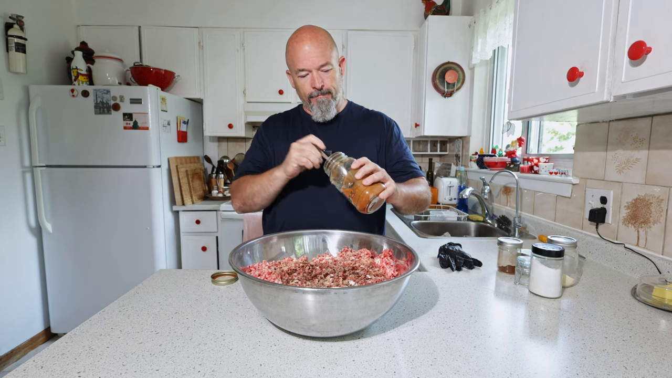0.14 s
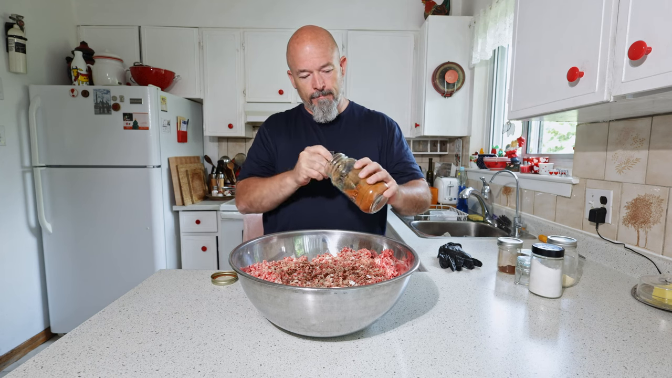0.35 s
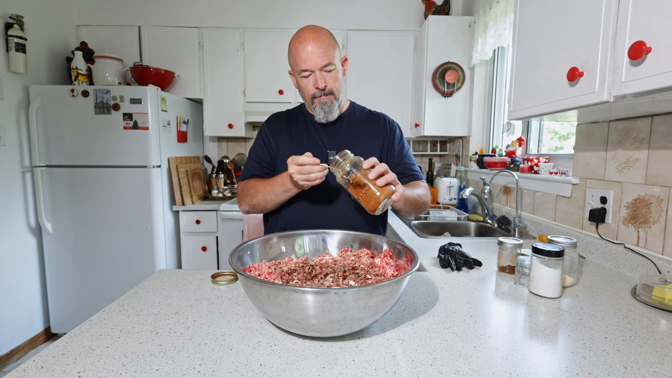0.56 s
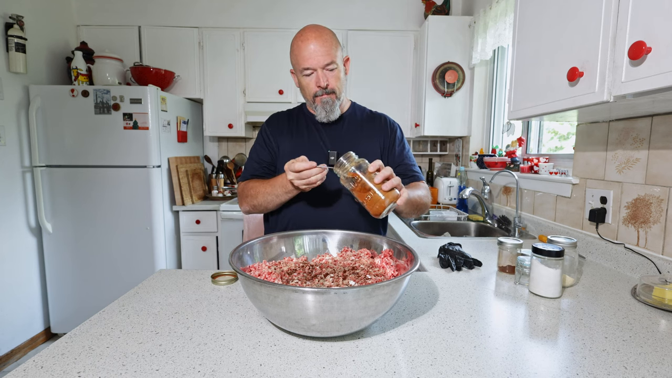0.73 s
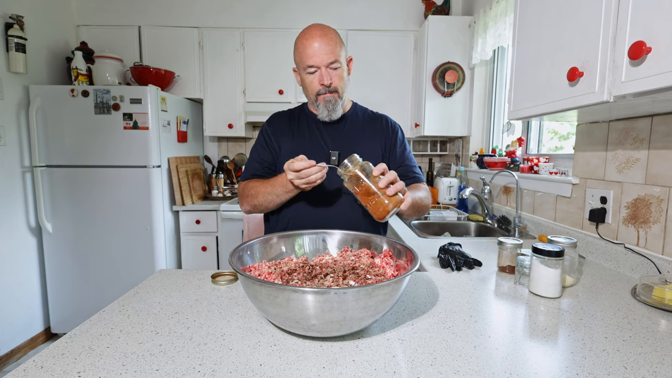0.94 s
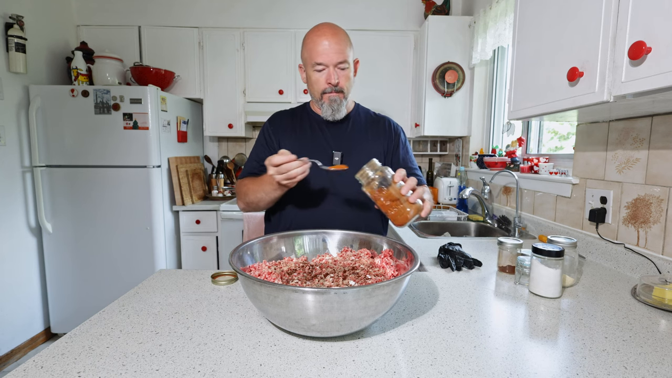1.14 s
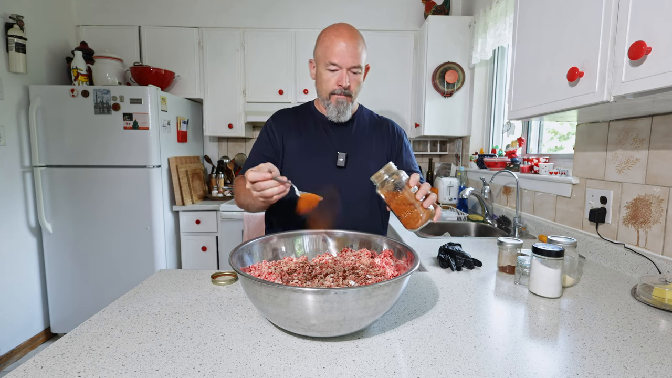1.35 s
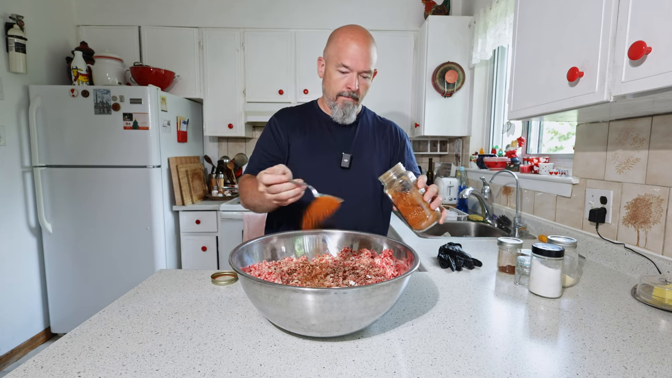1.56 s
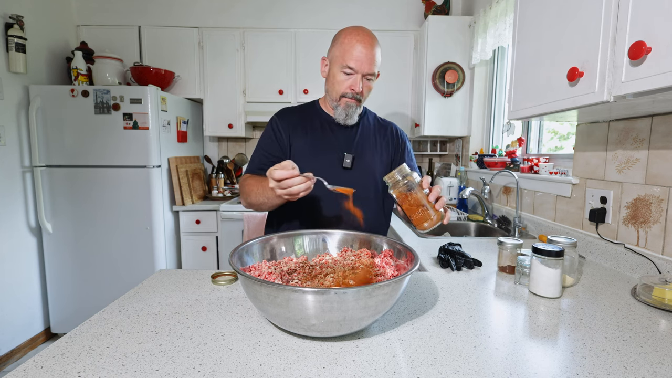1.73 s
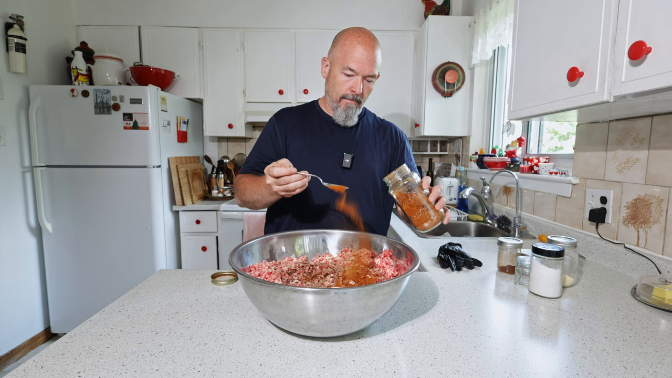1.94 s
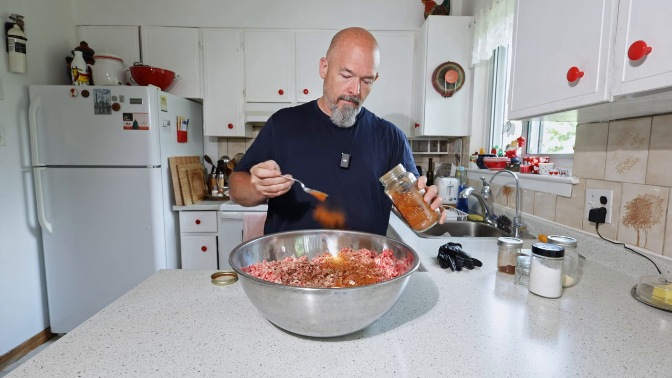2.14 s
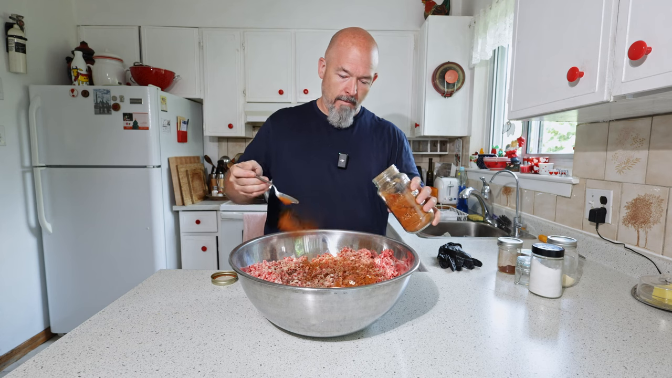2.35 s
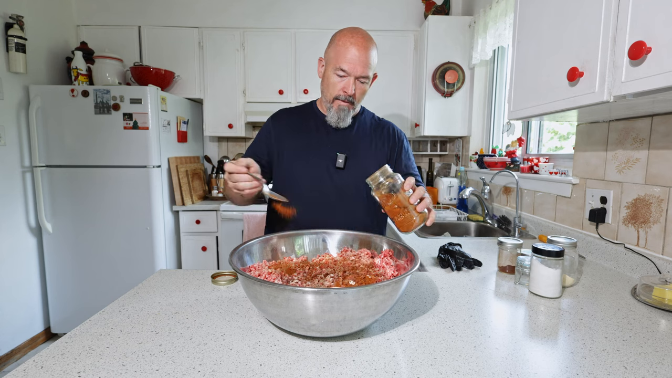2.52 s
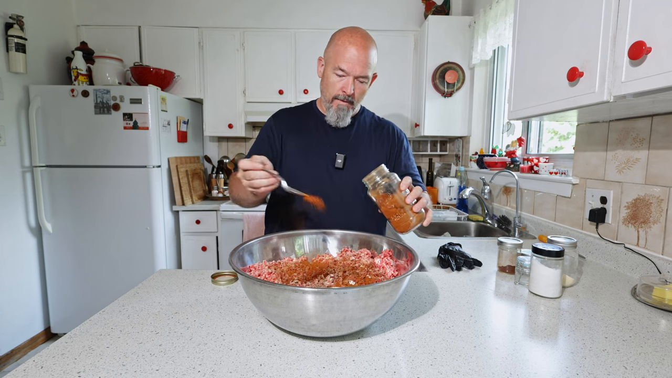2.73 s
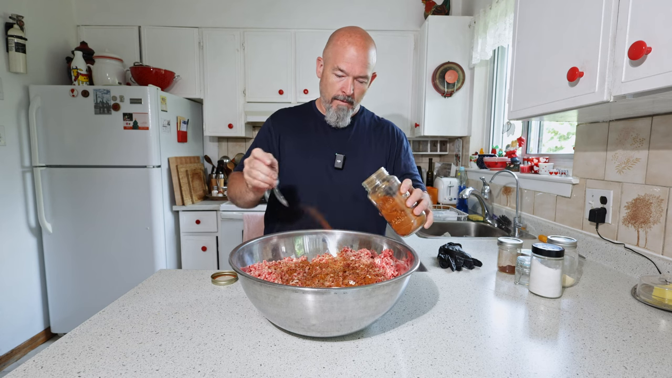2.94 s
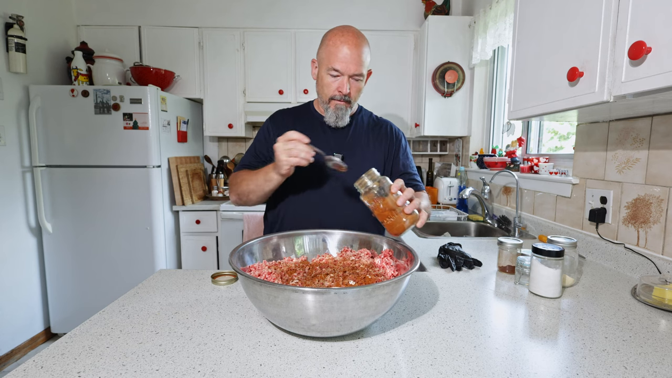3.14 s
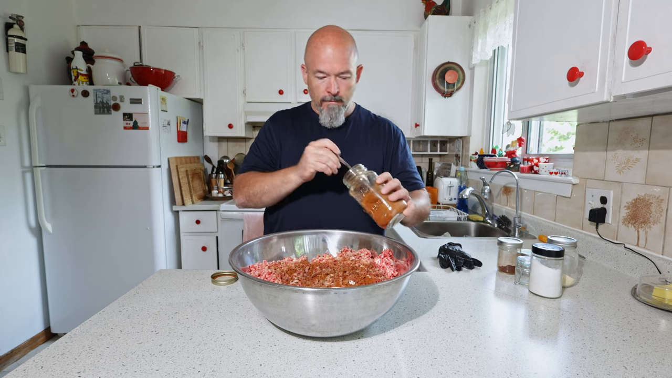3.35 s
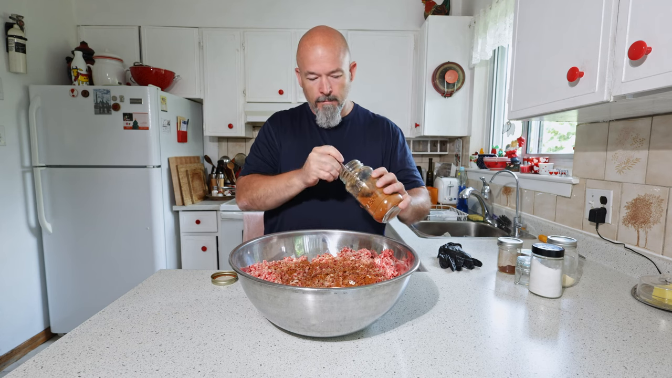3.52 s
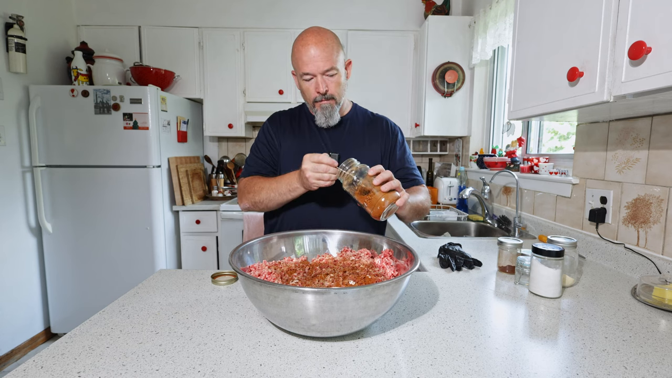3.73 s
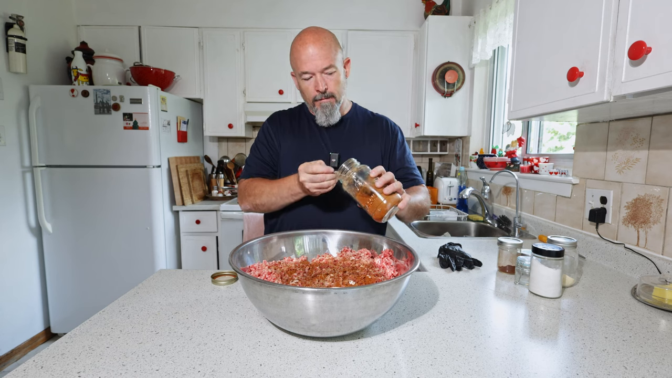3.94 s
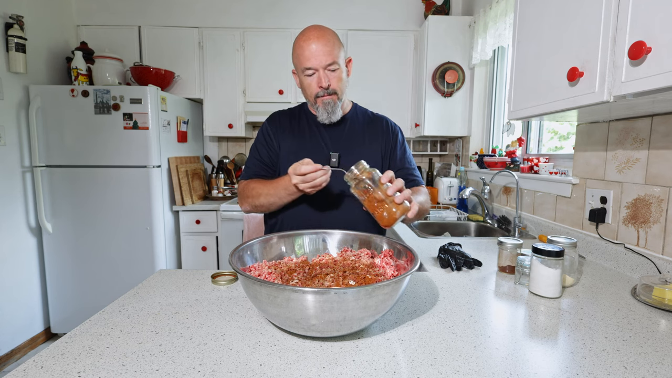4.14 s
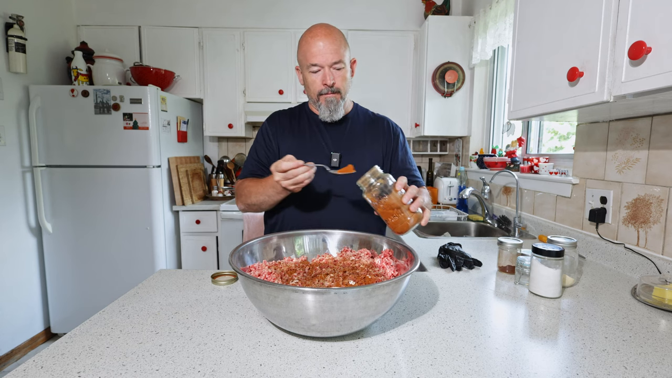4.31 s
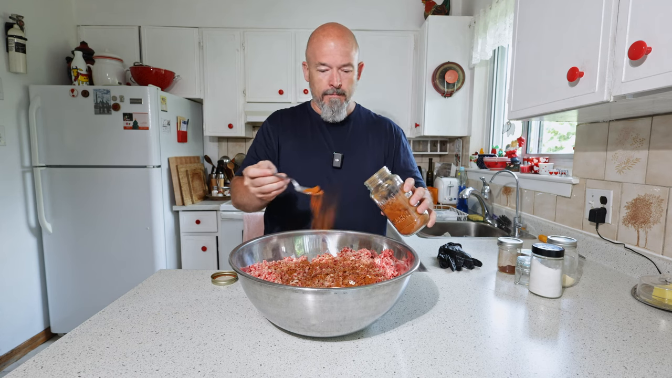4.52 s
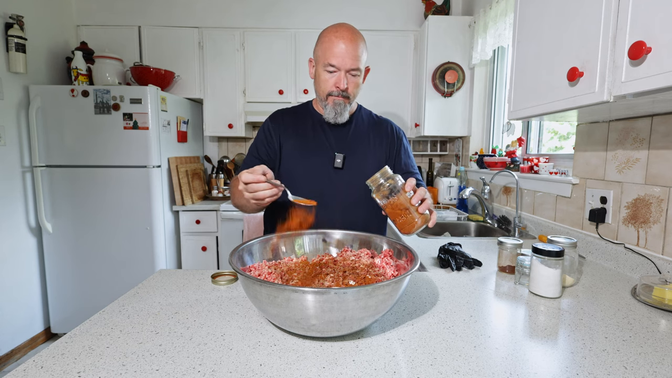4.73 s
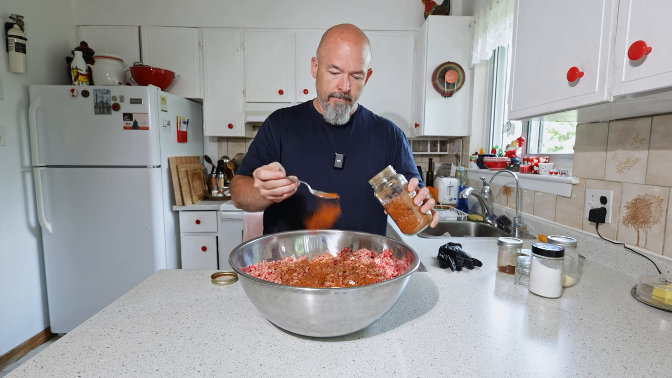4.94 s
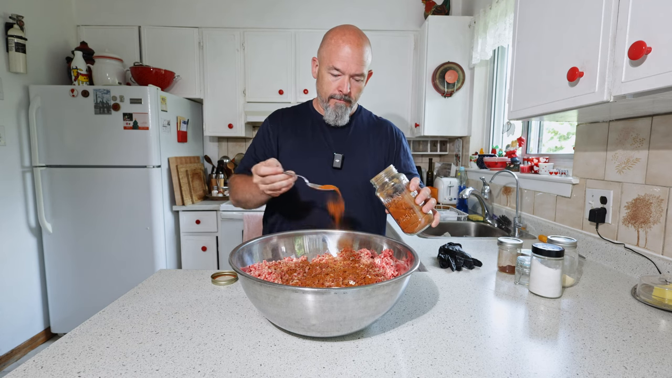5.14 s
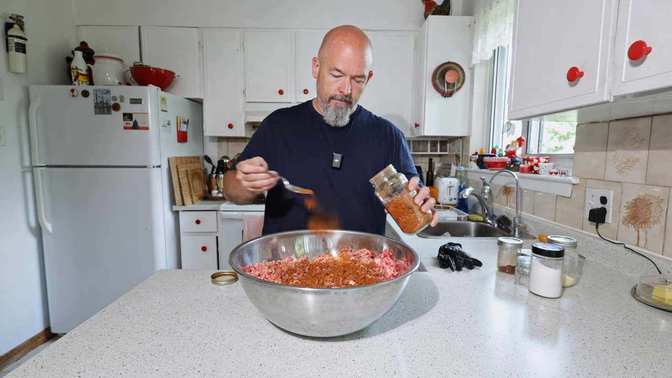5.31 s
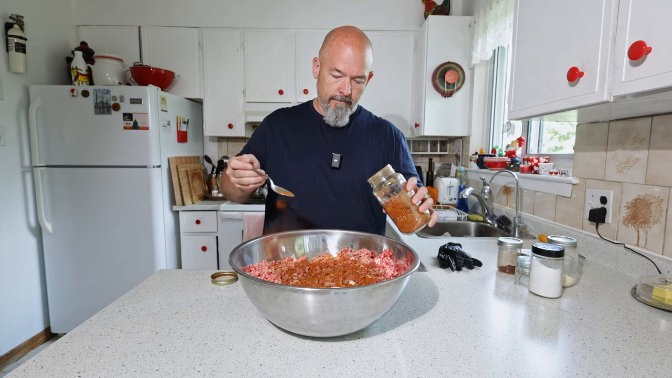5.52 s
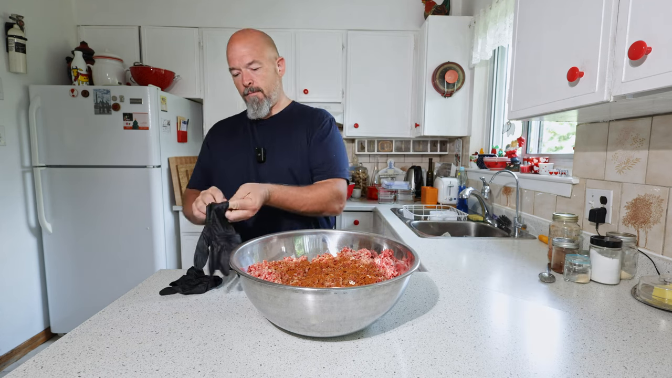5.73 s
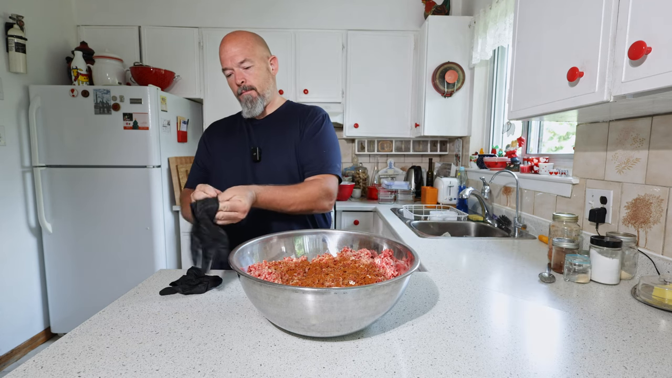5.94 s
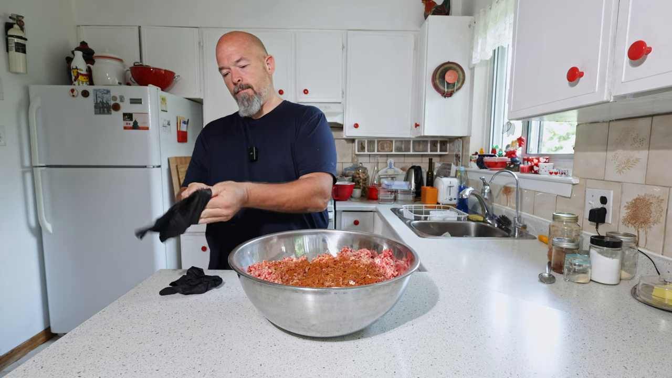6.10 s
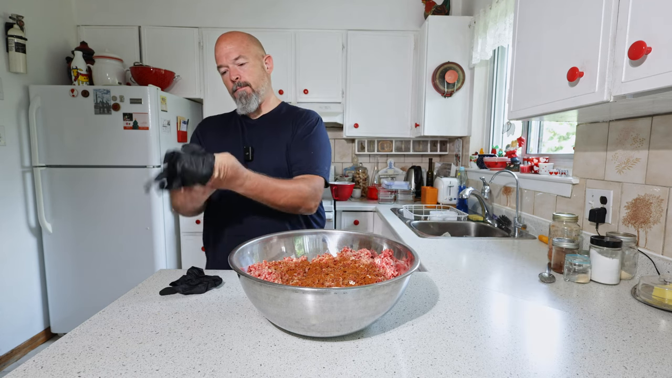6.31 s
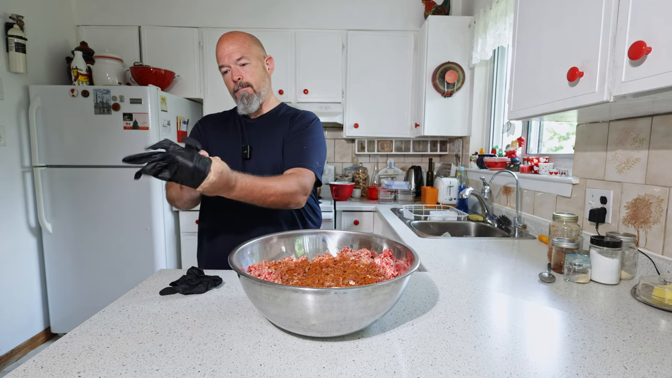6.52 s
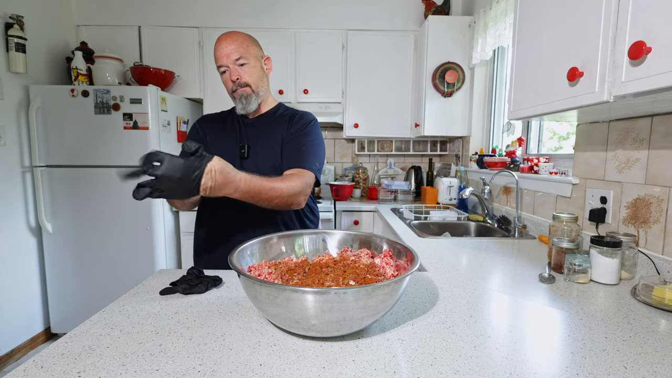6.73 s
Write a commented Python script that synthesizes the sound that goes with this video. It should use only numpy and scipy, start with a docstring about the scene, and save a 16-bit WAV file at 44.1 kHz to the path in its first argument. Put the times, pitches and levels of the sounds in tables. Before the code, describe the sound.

In a kitchen with a steadily humming fridge, a metal spoon knocks against a glass jar in two brief flurries, each with short, damped rings and a faint gritty scrape of powder. After another lull, thin rubber gloves slide over skin with crinkling, sharp snaps and little pops of air. A small body-worn mono microphone hears it all up close, with a slight room echo.

```python
"""A steel spoon knocks and drags on a hand-held glass jar, ringing its modes, and digs in spice powder.
Later thin rubber gloves rustle and slide onto a hand, snapping with a pop of air and a crack of the sheet.
A fridge motor rings its case throughout, over broad kitchen noise. Hard walls give a short echo.
Heard by a small mono microphone on the cook's chest."""
import sys
import numpy as np
from scipy import signal
from scipy.fft import rfft, irfft
from scipy.io import wavfile
from scipy.ndimage import uniform_filter1d

SR = 44100
rng = np.random.default_rng(int(sys.argv[2]) if len(sys.argv) > 2 else 0)


def log_audio(samples):
    """Write samples as a 16-bit WAV file to the path given in sys.argv[1]."""
    # one column per channel
    frames = np.atleast_2d(samples).T
    # limit to full scale, then quantise
    limited = np.clip(frames, -1, 1)
    pcm = np.round(limited * 32767).astype(np.int16)
    wavfile.write(sys.argv[1], SR, pcm)


N = 298326
TIME_S = np.arange(N) / SR


def undb(db):
    """dB to gain."""
    return 10 ** (np.asarray(db) / 20)


def unit(x):
    """Scale to rms 1."""
    return x / np.sqrt(np.mean(x ** 2))


def band(x, hz, width_hz):
    """Resonant band-pass, gain 1 at the centre."""
    return signal.lfilter(*signal.iirpeak(hz, hz / width_hz, SR), x)


def steep_band(x, hz, width_hz):
    """Two band-passes in series, the second twice as wide."""
    return band(band(x, hz, width_hz), hz, 2 * width_hz)


def add(out, start_s, x):
    """Mix x in at start_s."""
    i = int(start_s * SR)
    out[i:i + len(x)] += x[:len(out) - i]


def grains(scatter_db):
    """Dense slips of very uneven size."""
    return unit(rng.standard_normal(N) * undb(scatter_db * rng.exponential(size=N)))


def wander(rate_hz):
    """Slow random drift, rms 1."""
    k = int(SR / rate_hz)
    return unit(uniform_filter1d(uniform_filter1d(rng.standard_normal(N + k), k), k)[:N])


# Each row: frequency in Hz, relative spectral density in dB.
AIR_SPECTRUM = [(28, -50), (48, -20), (100, -23.5), (190, -10), (420, -8), (800, -16), (1300, -24),
                (2500, -32.5), (6000, -38), (15500, -39.5), (15900, -44)]


def kitchen_air():
    """Broad room noise, strongest in the low mids."""
    hz, db = np.transpose(AIR_SPECTRUM)
    bin_hz = np.arange(N // 2 + 1) * SR / N
    shape_db = np.interp(np.log(bin_hz + 1), np.log(hz), db, left=-90, right=-90)
    return unit(irfft(rfft(rng.standard_normal(N)) * undb(shape_db), N)) * undb(-47.5)


# Each row: centre in Hz, width in Hz, relative level in dB.
FRIDGE_CASE = [(61, 4.1, -65), (132.6, 15, -53.5), (234.8, 15, -50), (481.8, 38, -52.5), (752.5, 3.2, -61),
               (2690, 270, -68), (4155, 150, -71.5)]
# Each row: frequency in Hz, relative level in dB.
FRIDGE_TONES = [(1421, -74), (2735, -68), (2826, -77), (3187, -85), (3505, -71.5), (3898, -77.5),
                (4091, -78)]


def fridge():
    """The motor rings the case; thin tones waver in level above it."""
    case = sum(undb(db) * unit(band(rng.standard_normal(N), hz, width)) for hz, width, db in FRIDGE_CASE)
    tones = sum(undb(db - 1 + 2 * wander(3.9)) * np.sin(2 * np.pi * hz * TIME_S)
                for hz, db in FRIDGE_TONES)
    return case + tones


# Each row: gain in dB of the ten mode families (inside air, 3 wall, rim, 3 neck, 2 spoon).
# Rows are places: 0 lip, 1 neck, 2 belly, 3 bottom through the powder.
PLACE_GAINS_DB = [(-15.5, -6, -8, -14.5, 0.5, -9.5, -18, -10.5, 6.5, -3.5),
                  (-12, -3, 2, -12, -8.5, -21, -8, -15, -8, -3),
                  (-3, -5, -13, 1, -17.5, -15.5, -30, -32, -17, -14.5),
                  (3.5, 6, -10, -17.5, -16, -22, -35, -33, -35, -22)]


def landing_db(place):
    """Where the spoon lands sets which families ring; interpolated between places."""
    return np.array([np.interp(place, range(len(family)), family)
                     for family in np.transpose(PLACE_GAINS_DB)])


# Hand-damped jar and spoon, one family per row. Each mode: frequency in Hz, relative level in dB, t60 in s.
JAR_MODES = [
    [(218, 0, 0.025), (522, 5, 0.034)],
    [(1024, 8.5, 0.007), (1422, -5, 0.026), (1694, -6, 0.02)],
    [(2105, 2, 0.018), (2270, -5, 0.046), (2373, 6.5, 0.016), (3195, -6, 0.049)],
    [(2560, -12, 0.046), (2862, -3, 0.043), (2877, -13, 0.12)],
    [(4030, -20, 0.011), (3717, 4, 0.038), (3800, -36.5, 0.54), (3940, -5.5, 0.044)],
    [(4680, -3.5, 0.033), (5080, -13, 0.11), (5140, -13, 0.062)],
    [(5556, 3.5, 0.057)],
    [(5836, 14.5, 0.015), (6000, 4.5, 0.033)],
    [(7300, -2.5, 0.014), (8180, -2.5, 0.015), (8500, -23, 0.061)],
    [(10070, -4.5, 0.015), (11060, -3.5, 0.014), (13570, -6, 0.02), (14900, -13.5, 0.024),
     (15300, -25, 0.11)],
]
# Each row: start in seconds, base level in dB, place 0-3, hardness in dB per octave,
# pitch the hand leaves free in Hz, its boost in dB.
SPOON_KNOCKS = [(0.136, -42, 2.9, -2, 1500, 6), (0.1551, -42, 2.7, -1.5, 1500, 6),
                (0.177, -46.5, 0.116, -2, 4800, 22.5), (0.2591, -29, 2.2, 2, 2800, 3),
                (0.2823, -10.5, 0.01, .6, 2200, 2.5), (0.3365, -25, 0.97, -3.5, 2300, 4),
                (0.343, -35.5, 0.64, 5, 2900, 6), (0.432, -48, 0.71, 5, 6000, 3),
                (0.4824, -39.5, 1, 0, 2290, 8), (0.514, -42.5, 0.96, 0, 2300, 5),
                (0.542, -40, .6, 1, 5940, 7.5), (0.6424, -10, 1.98, 0.7, 2900, 0),
                (0.7591, -20, 2.12, 1.8, 3800, 12), (0.8838, -28.5, 2.7, .1, 2900, 1.5),
                (1.018, -26, 2.26, 0.2, 3740, 13), (3.422, -14, 1.06, 1, 3730, 3.5),
                (3.651, -37, 1.1, 5, 5600, 2), (3.677, -33, 1.24, 2, 2310, 4),
                (3.712, -36.5, .6, 4.5, 6100, 5), (3.741, -41.5, 0.98, 1.5, 6200, 12),
                (3.767, -36.5, 0.95, -.6, 6140, 4), (3.7909, -36.5, 1.9, 0, 6100, 15),
                (3.813, -51, 1.8, .6, 6100, 9), (3.954, -17.5, 1.71, -.6, 3770, 14),
                (4.016, -35, 2.95, -3, 1100, 9), (4.0482, -32.5, 2.8, 0, 3780, 18),
                (4.0644, -29.5, 2.22, 0, 3800, 17), (4.129, -41, 3.3, -2.5, 1480, 6)]


def spoon_knocks(crack_db=-6, crack_t60_s=0.0091, rebound_db=-17, free_width_oct=0.11):
    """Each blow starts the jar's modes, with a short crack of contact on top."""
    out, t = np.zeros(N), np.arange(SR // 4) / SR
    hz, mode_db, t60_s = np.vstack(JAR_MODES).T[:, :, None]
    octaves = np.log2([family[0][0] / 3000 for family in JAR_MODES])
    attack = np.minimum(t / 0.00097, 1)
    for start_s, level_db, place, hardness, free_hz, boost_db in SPOON_KNOCKS:
        freedom = np.exp(-((octaves - np.log2(free_hz / 3000)) / free_width_oct) ** 2)
        family_db = level_db + landing_db(place) + hardness * octaves + boost_db * freedom
        struck_db = np.repeat(family_db, [len(family) for family in JAR_MODES])[:, None]
        # A hard blow rebounds; after a light one the spoon rests on the glass and damps it.
        t60_scale = undb(0.19 * min(max(family_db[2:]) - rebound_db, 0))
        detune, phase, scatter = rng.standard_normal((3, len(hz), 1))
        modes = np.sin(2 * np.pi * hz * (1 + 0.0018 * detune) * t + 2 * phase)
        modes *= undb(struck_db + mode_db + 2.4 * scatter - 60 * t / (t60_s * t60_scale))
        crack = np.diff(rng.standard_normal(len(t) + 1))
        crack *= undb(family_db[-1] + crack_db - 60 * t / crack_t60_s)
        add(out, start_s, (modes.sum(axis=0) + crack) * attack)
    return out


# Each row: start in seconds, hold in seconds, glass base level in dB, place 0-3, singing mode in Hz,
# its level in dB, powder level in dB, grit level in dB, fade in dB per second.
SPOON_DRAGS = [(0.287, .005, -33, .5, 2300, -38, -59, -50, 194),
               (.42, 0.111, -60, .6, 2300, -58, -58, -66, 63),
               (0.64, 0.0042, -36, 1.95, 2918, -37, -33, -40, 175),
               (0.763, 0.037, -48, 1.9, 3741, -49, -48, -59, 112),
               (3.435, .09, -56, 0.65, 3741, -49, -48, -60, 250),
               (3.7, .12, -58, 0.91, 6160, -59, -63, -70, 350),
               (3.957, .06, -52, 2.2, 3736, -48, -54, -57, 200),
               (4.04, .04, -48, 1.8, 3736, -47, -48, -68, 270)]


def spoon_drags(rise_s=0.0094):
    """Small slips ring walls, rim and neck, one mode singing; powder crunches and grits on the glass."""
    out, t = np.zeros(N), np.arange(SR // 2) / SR
    slips = grains(scatter_db=3)
    ringing = np.array([unit(sum(undb(db) * unit(band(slips, hz, 4.5 / t60)) for hz, db, t60 in family))
                        for family in JAR_MODES[2:8]])
    crunch = grains(scatter_db=2.46)
    powder = unit(steep_band(crunch, 1500, 2200))
    grit = unit(steep_band(crunch, 5050, 1000))
    for start_s, hold_s, glass_db, place, sing_hz, sing_db, powder_db, grit_db, fade in SPOON_DRAGS:
        span = slice(int(start_s * SR), int(start_s * SR) + len(t))
        envelope = np.minimum(t / rise_s, 1) * undb(-fade * np.maximum(t - hold_s, 0))
        glass = undb(glass_db + landing_db(place)[2:8]) @ ringing[:, span]
        spice = undb(powder_db) * powder[span] + undb(grit_db) * grit[span]
        singing = undb(sing_db) * unit(band(slips[span], sing_hz, width_hz=40))
        add(out, start_s, envelope * (glass + spice + singing))
    return out


# Each row: centre in Hz, width in Hz. Rows: cuff air, finger pockets, loose sheet, taut sheet, crinkle,
# high treble peak near 15 kHz heard in the rustle and snaps.
GLOVE_BANDS = [(470, 283), (1400, 620), (2550, 1900), (5300, 2800), (8600, 5000), (14800, 1800)]
# Sliding colour: relative gain in dB per glove band.
SLIDE_COLOUR_DB = (1.6, -0.4, -1, -2.5, -2.5, -5)
# Each row: time in seconds, base level of cuff and pockets in dB, base level of the sheet in dB.
SLIDE_LEVELS = [(5.725, -37, -50), (5.75, -35, -43.5), (5.8, -43, -51), (5.865, -45, -43.5),
                (5.95, -47, -54.5), (5.995, -48, -34), (6.03, -58.5, -42.5), (6.13, -50, -46),
                (6.175, -29.5, -41), (6.21, -40, -41.5), (6.24, -40, -46), (6.33, -39.5, -42.5),
                (6.39, -33.5, -37.5), (6.46, -40, -42), (6.53, -22, -37.5), (6.575, -24.5, -36.5),
                (6.63, -43, -47.5), (6.7, -38, -50), (6.765, -24, -48)]


def glove_slide():
    """Rubber slips over skin, feeding each band in patches."""
    out, patches = np.zeros(N), wander(44)
    times_s, *levels_db = np.transpose(SLIDE_LEVELS)
    hollow, sheet = undb([np.interp(TIME_S, times_s, db, left=-120, right=-120) for db in levels_db])
    for gain, colour_db, (hz, width_hz) in zip([hollow] * 2 + [sheet] * 4, SLIDE_COLOUR_DB, GLOVE_BANDS):
        flicker_db = 1.56 * patches + 1.3 * wander(66.4)
        rustle = unit(steep_band(grains(scatter_db=2.77), hz, width_hz))
        out += gain * undb(colour_db + flicker_db - 3) * rustle
    return out


# Each row: start in seconds, pop level in dB, pop pitch in Hz, crack level in dB, crack pitch in Hz.
GLOVE_SNAPS = [(5.728, -36, 1400, -31, 6000), (5.79, -25, 900, -28, 8000),
               (5.797, -21.5, 1490, -20.5, 6540), (5.8469, -16.5, 1100, -16.5, 3500),
               (5.8533, -20.5, 600, -18, 13000), (5.9668, -24, 550, -18, 9000),
               (5.9744, -10, 900, -6, 2400), (5.9777, -7, 2500, -3.5, 9600), (5.986, -31, 2400, -20, 13000),
               (6.1556, -13, 1090, -17, 4860), (6.249, -39, 1400, -28, 2600),
               (6.281, -22.5, 1100, -43, 5000), (6.303, -20, 1270, -46, 6000),
               (6.3572, -30, 600, -38, 6000), (6.368, -21, 1450, -25, 7800), (6.378, -15, 1400, -32, 6000),
               (6.3956, -19, 800, -15, 3480), (6.427, -39, 1400, -27, 3400), (6.53, -13, 950, -41, 5000),
               (6.5425, -29.5, 650, -33, 4500), (6.5688, -37, 500, -14, 7800),
               (6.7413, -27, 950, -43, 4500)]


def glove_snaps(pop_db_per_oct2=13, crack_db_per_oct2=12, flap_t60_s=0.38):
    """Trapped air pops and the sheet cracks, then flaps on loosely."""
    out, t = np.zeros(N), np.arange(SR // 5) / SR
    for start_s, pop_db, pop_hz, crack_db, crack_hz in GLOVE_SNAPS:
        for hz, width_hz in GLOVE_BANDS:
            pop = undb(pop_db - pop_db_per_oct2 * np.log2(hz / pop_hz) ** 2)
            crack = undb(crack_db - crack_db_per_oct2 * np.log2(hz / crack_hz) ** 2)
            t60_s = 0.024 * (1400 / hz) ** 0.27  # treble dies first
            burst = steep_band(rng.standard_normal(len(t)) * undb(-60 * t / t60_s), hz, width_hz)
            add(out, start_s, (pop + crack) * burst / np.abs(burst).max())
        flap = unit(steep_band(rng.standard_normal(len(t)), 2450, 1060))
        add(out, start_s, flap * undb(crack_db - 25 - 60 * t / flap_t60_s))
    return out


# Each row: centre in Hz, t60 in seconds, relative level in dB.
ECHO_BANDS = [(495, 0.24, -12.5), (2370, 0.33, -17), (6700, 0.4, -23.5), (13001, .18, -50)]


def wall_echo(x, build_s=0.0055):
    """Diffuse echo: decaying noise in four bands, building up over the first reflections."""
    t, tail = np.arange(SR // 2) / SR, 0
    for hz, t60_s, db in ECHO_BANDS:
        noise = band(rng.standard_normal(len(t)), hz, 1.69 * hz)
        tail += noise * undb(db - 25 - 60 * t / t60_s) * np.minimum(t / build_s, 1)
    return signal.fftconvolve(x, tail)[:N]


# Each row: time in seconds, background gain in dB.
BACKGROUND_SWELL = [(0, 1), (.25, 1), (.55, 2.5), (0.849, 6.5), (1.2, 4)]


def scene():
    """Spoon, gloves and echo over a background that rises in the first second; same in both channels."""
    near = spoon_knocks() + spoon_drags() + glove_slide() + glove_snaps()
    swell = undb(np.interp(TIME_S, *np.transpose(BACKGROUND_SWELL)))
    mono = near + wall_echo(near) + swell * (kitchen_air() + fridge())
    return np.tile(mono, (2, 1))


def record(dry):
    """Faint electronics noise, opposite in the two channels; bass cut, rounded peaks, treble cut."""
    hiss = undb(-71) * unit(band(band(rng.standard_normal(N), 10800, 12000), 10800, 12000))
    rumble = undb(-80.5) * unit(band(band(rng.standard_normal(N), 45, 50), 45, 50))
    noisy = dry + (hiss + rumble) * np.array([[1], [-1]])
    capsule = signal.sosfilt(signal.butter(2, 45, "high", fs=SR, output="sos"), noisy)
    rounded = 0.9 * capsule / (0.9 ** 4 + capsule ** 4) ** 0.25
    return signal.sosfilt(signal.ellip(12, 0.2, 90, 16650, fs=SR, output="sos"), rounded)


dry = scene()
out = record(dry)
log_audio(out)
```